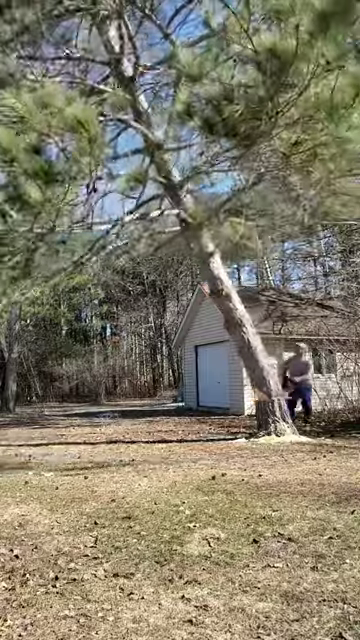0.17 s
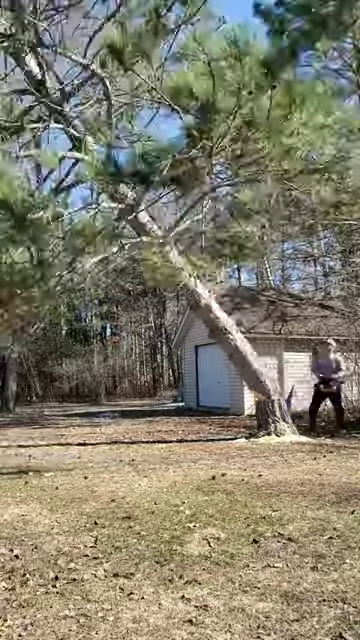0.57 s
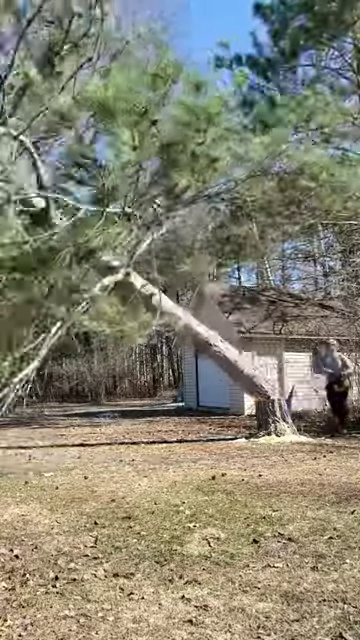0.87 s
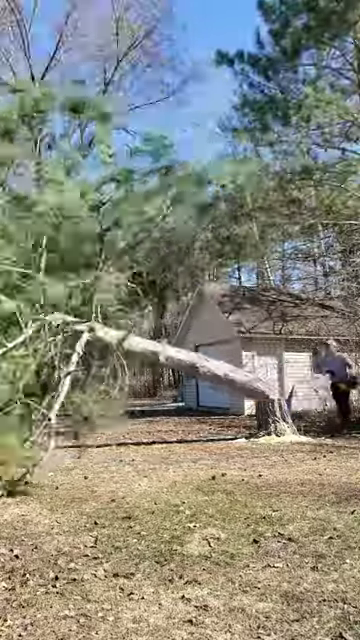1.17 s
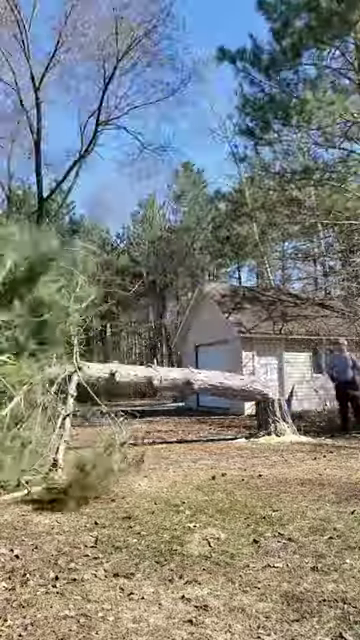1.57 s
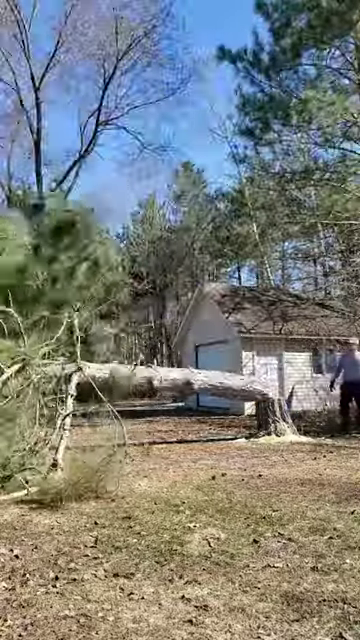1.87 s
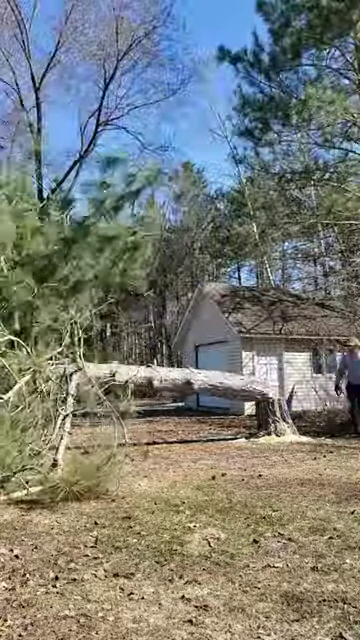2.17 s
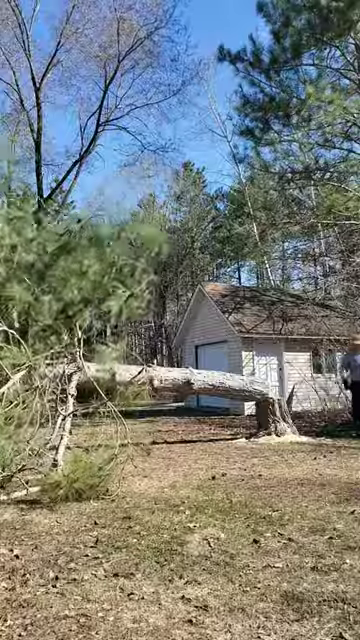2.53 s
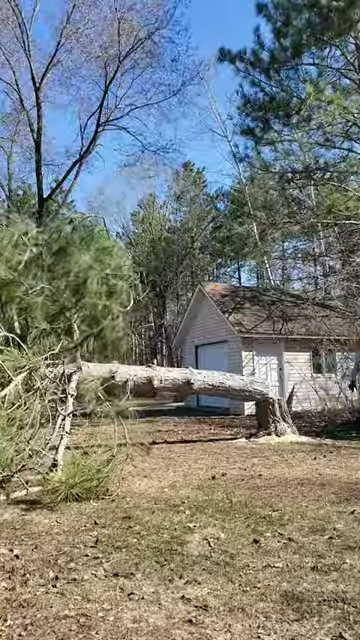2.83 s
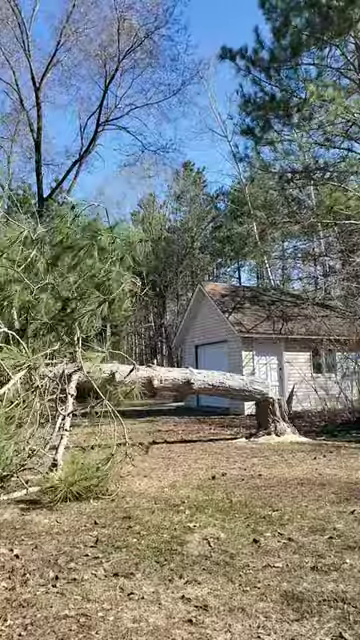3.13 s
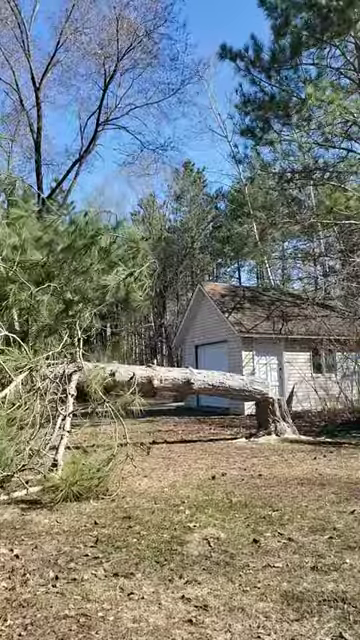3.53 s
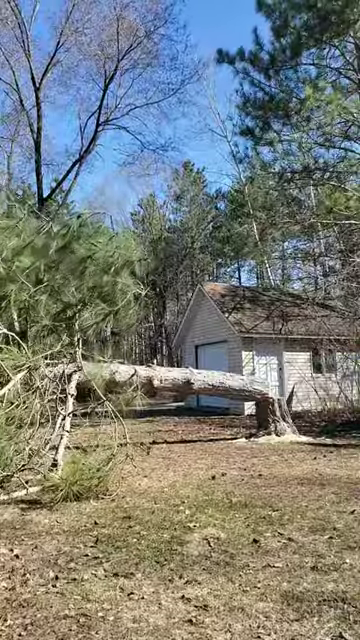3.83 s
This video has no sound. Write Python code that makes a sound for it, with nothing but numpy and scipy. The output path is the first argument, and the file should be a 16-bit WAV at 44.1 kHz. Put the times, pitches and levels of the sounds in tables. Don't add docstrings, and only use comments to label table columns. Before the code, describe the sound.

Tree falling in an open yard: creaky wood cracks quicken, branches snap and needles hiss on impact, settling with a few late snaps before strong gusts buffet the phone microphone.

```python
import sys
import numpy as np
from scipy import signal
from scipy.io import wavfile
from scipy.ndimage import uniform_filter1d

SR = 44100
rng = np.random.default_rng(int(sys.argv[2]) if len(sys.argv) > 2 else 0)


def to_wav(sig):
    pcm = np.clip(np.atleast_2d(sig), -1, 1) * 32767
    pcm = np.round(pcm).astype(np.int16)
    wavfile.write(sys.argv[1], SR, pcm.T)


def decibels_to_gain(level_db):
    exponent = np.asarray(level_db, float) / 20
    return 10 ** exponent


N = 176400

# frequency in Hz, level in dB.
AIR_SPECTRUM = [(150, -9), (400, -4.5), (1360, -16.5), (4200, -19.5), (11600, -30), (15500, -56)]
# frequency in Hz, level in dB.
BUFFET_SPECTRUM = [(15, -42), (30, -3.5), (65, 6), (90, 0.5), (190, -9.5), (400, -24.5), (700, -38)]
# centre in seconds, peak in dB, length in seconds, eddy rate in Hz.
LEFT_GUSTS = [(.023, -32.5, 0.046, 73), (.098, -33.5, .026, 87.2), (.146, -39.5, .025, 69),
              (.248, -43, .038, 66.6), (.297, -46, 0.024, 85.5), (.324, -44.5, .024, 68),
              (.401, -46.5, 0.021, 71), (.53, -39, .026, 86.7), (.565, -45, 0.027, 77.4),
              (.605, -43.5, 0.042, 85), (.705, -38, .023, 80), (.733, -38, .02, 85.3),
              (.79, -42.5, .014, 204), (1.38, -50, 0.065, 110.5), (1.483, -42, .014, 226),
              (1.55, -60, .07, 93.2), (1.623, -52.5, .05, 102), (1.82, -56, .06, 84.8),
              (2.778, -42.5, .031, 84), (2.836, -44, .022, 100), (2.974, -35, .04, 74.3),
              (3.033, -48, .019, 114), (3.085, -34, 0.058, 84.2), (3.17, -36.5, .04, 84.4),
              (3.207, -38, .02, 104), (3.247, -25.5, .021, 106.5), (3.275, -28.5, .02, 117.6),
              (3.325, -41, 0.048, 91), (3.385, -38, 0.049, 86.5), (3.436, -43.5, .019, 117),
              (3.477, -43, .023, 75), (3.542, -38, .034, 77.3), (3.585, -48, .024, 82),
              (3.62, -38.5, .025, 98.3), (3.65, -39, 0.022, 89.7), (3.68, -37, 0.023, 77.5),
              (3.712, -35, 0.036, 78), (3.766, -30.5, 0.024, 148.8), (3.944, -45, .052, 97.4)]
# centre in seconds, peak in dB, length in seconds, eddy rate in Hz.
RIGHT_GUSTS = [(0.16, -41.5, .027, 83.5), (0.25, -47, .018, 121), (.544, -55, 0.029, 93),
               (0.711, -39, .023, 86), (.737, -38, 0.02, 117), (0.823, -48, 0.045, 112.8),
               (1.381, -50, 0.061, 122.5), (1.48, -47, 0.0136, 228), (1.588, -57, 0.098, 90.5),
               (2.102, -58.5, .08, 95), (2.762, -46, 0.017, 97), (2.83, -40, 0.045, 114.4),
               (2.878, -43, 0.029, 68), (2.921, -36, 0.025, 99), (2.982, -37, .03, 78.6),
               (3.035, -31.5, .021, 95.4), (3.08, -29.5, .024, 83.5), (3.172, -37.5, .031, 110.5),
               (3.211, -37, .018, 86), (3.242, -27, 0.034, 98), (3.302, -30.5, .03, 80),
               (3.34, -33.5, .022, 80), (3.389, -39.5, 0.036, 89.8), (3.462, -46.5, 0.043, 91),
               (3.532, -39.5, 0.035, 101.3), (3.585, -44, 0.01, 74), (3.616, -33.5, .019, 85.5),
               (3.672, -33, 0.037, 66.4), (3.716, -37, .022, 78.7), (3.762, -30.5, .016, 171.3),
               (3.791, -32, .045, 100.7), (3.86, -36, .061, 63), (3.949, -36.5, .033, 70)]
# time in seconds, level in dB, needle brightness in dB.
CROWN_RUSH = [(0, -45, -44), (.2, -59.5, -13), (0.601, -62.5, -9.5), (1.0, -61, -10), (1.15, -50.5, -5.5),
              (1.4, -45, -11.5), (1.72, -50, -9), (1.92, -58.5, -6), (2.05, -64, -6.5), (2.8, -62.5, -5.5),
              (3.15, -64, -11), (4, -69.5, -12.5)]
# frequency in Hz, level in dB.
BOUGH_SPECTRUM = [(150, -16), (400, -6), (1100, -9.5), (3000, -12), (6500, -12), (9000, -26)]
# frequency in Hz, level in dB.
NEEDLE_SPECTRUM = [(6000, -57), (8500, 12), (10000, 16), (14000, 11), (15600, 8)]
# start in seconds, peak in dB, ring in Hz, length in seconds, treble in dB.
SPLINTERS = [(.002, -29.5, 3250, 0.014, -39), (0.022, -31, 2390, 0.011, -1.5), (0.256, -37, 3900, 0.013, 0),
             (0.355, -30.5, 2190, .012, -37), (0.379, -46, 3570, 0.1, -30), (0.43, -26, 1520, 0.012, -33),
             (0.446, -30.5, 1150, 0.053, -52), (0.47, -45, 630, 0.011, -45), (0.475, -32, 3300, 0.011, -52),
             (0.492, -35.5, 1220, 0.049, -28), (.535, -34.5, 1180, 0.044, -42),
             (0.571, -41, 1170, 0.046, -25), (0.587, -37.5, 3400, 0.02, -1.5),
             (0.653, -30.5, 2360, 0.02, -28), (0.703, -37, 5740, 0.015, -6),
             (0.74, -42.5, 3620, 0.0079, -9), (0.759, -35.5, 1740, 0.011, -11),
             (0.781, -28.5, 1390, 0.0095, -35), (0.796, -33, 1070, 0.05, -43),
             (0.824, -35.5, 1160, 0.046, -33), (0.851, -32, 1320, 0.0072, -43),
             (0.878, -34, 2470, 0.029, -6), (0.913, -40, 1800, 0.022, -20), (0.957, -31, 1390, 0.016, -36),
             (0.992, -32, 1130, 0.015, -13), (1.016, -32, 890, 0.035, -12), (1.038, -34, 850, 0.044, -4.5)]
# start in seconds, peak in dB, ring in Hz, length in seconds, treble in dB.
SNAPS = [(1.099, -38, 3520, 0.012, 2), (1.117, -35, 1800, 0.017, -15), (1.135, -30, 3320, 0.018, -9),
         (1.152, -32, 2410, 0.035, -1.5), (1.173, -50, 1770, 0.011, -5), (1.197, -36.5, 3300, 0.015, -12),
         (1.221, -31.5, 2750, 0.0063, -20), (1.246, -29, 2870, 0.013, -21), (1.264, -37, 4720, 0.036, -5),
         (1.298, -36.5, 3220, 0.017, -2), (1.319, -30.5, 3060, 0.014, -3), (1.336, -32.5, 1120, 0.032, -11),
         (1.362, -30, 3830, 0.048, -1), (1.386, -37, 4540, 0.0034, -2), (1.405, -39.5, 1620, 0.025, 1),
         (1.45, -45, 3060, 0.0048, -16), (1.469, -29, 1140, 0.011, -47), (1.499, -33.5, 2840, 0.019, 0.5),
         (1.553, -29.5, 2680, 0.012, -13), (1.572, -37, 2740, 0.078, 0), (1.638, -38.5, 2130, 0.065, 3),
         (2.333, -49.5, 3020, 0.011, -15), (2.837, -46.5, 4270, 0.0091, -3), (2.957, -54.5, 4230, 0.013, 7),
         (3.388, -53.5, 2800, 0.011, -7), (1.706, -49, 1200, 0.37, -45)]
# frequency in Hz, level in dB.
WOOD_SPECTRUM = [(150, -4.5), (300, -6.5), (700, -4.5), (1200, -3), (2500, -5.5), (4500, -9), (6800, -21),
                 (9000, -26.5)]
# frequency in Hz, time to fall 60 dB in seconds.
YARD_DECAY = [(500, 0.43), (3000, 0.71), (15000, 0.027)]
# centre in seconds, gain change in dB.
DUCKS = [
    (0.343, 1.5),
    (0.428, -14.5),
    (.645, -1.5),
    (1.088, -5.5),
    (1.243, -5),
    (1.543, 0.5),
]


def evened(x):
    return x / np.sqrt(np.mean(x ** 2) + 1e-20)


def read(points, hz):
    f, value = np.transpose(points)
    return np.interp(np.log(hz + 1), np.log(f + 1), value)


def colour(x, points):
    hz = np.fft.rfftfreq(8192, 1 / SR)
    points = [(points[0][0] / 2, -90)] + list(points) + [(points[-1][0] * 1.5, -90)]
    log_gain = read(points, hz) * np.log(10) / 20
    log_gain = np.concatenate([log_gain, log_gain[-2:0:-1]])
    minimum_phase = np.exp(np.conj(signal.hilbert(log_gain)))
    taps = np.fft.ifft(minimum_phase).real[:4096]
    return signal.oaconvolve(x, taps[None] / np.linalg.norm(taps), axes=1)[:, :x.shape[1]]


def patchy(x, depth_db, size=512):
    z = signal.stft(x, nperseg=size)[2]
    field = rng.standard_normal(z.shape[1:])
    field = uniform_filter1d(field, size=5, axis=0)
    field = evened(uniform_filter1d(field, size=6, axis=1))
    return signal.istft(z * decibels_to_gain(depth_db * field), nperseg=size)[1][:, :N]


def wander(span_s):
    n = max(round(span_s * SR), 2)
    once = uniform_filter1d(rng.standard_normal((2, N)), n, axis=1)
    return evened(uniform_filter1d(once, n, axis=1))


def grit(per_s, spread_db):
    struck = rng.random((2, N)) < per_s / SR
    size = decibels_to_gain(spread_db * np.minimum(rng.exponential(1, (2, N)), 5))
    return evened(struck * rng.choice([-1., 1.], (2, N)) * size)


def swell(length, rise, fall, sag_db):
    t = np.arange(0, length + 8 * fall, 1 / SR)
    attack = np.sin(np.pi / 2 * np.minimum(t / rise, 1)) ** 2
    sag = decibels_to_gain(sag_db * (np.maximum(t - rise, 0) / length) ** 2)
    return attack * sag * np.exp(-np.maximum(t - length, 0) / fall)


def add(mix, s, sound):
    part = mix[:, max(round(s * SR), 0):][:, :sound.shape[1]]
    part += sound[:, :part.shape[1]]


def air():
    return decibels_to_gain(-66.5) * patchy(colour(rng.standard_normal((2, N)), AIR_SPECTRUM), 1.3)


def wind():
    breeze_db, gust_db, slap_db, roll_db = -65, -4.5, 14.5, -2
    spread, pitch_wobble, steadiness = 0.58, 0.184, 0.5
    push = decibels_to_gain(breeze_db + 3.3 * wander(0.053))
    rolls, wobble = np.zeros((2, N)), wander(0.011)
    for port, gusts in enumerate([LEFT_GUSTS, RIGHT_GUSTS]):
        for s, db, length, hz in gusts:
            first = max(round((s - 2 * length) * SR), 0)
            n = np.arange(first, min(round((s + 2 * length) * SR), N))
            shape = decibels_to_gain(db) * np.exp(-((n / SR - s) / (spread * length)) ** 2)
            push[port, n] += decibels_to_gain(gust_db) * shape
            turns = rng.random() + np.cumsum(hz * (1 + pitch_wobble * wobble[port, n])) / SR
            rolls[port, n] += shape * np.cos(2 * np.pi * turns)
    eddies = colour(rng.standard_normal((2, N)), BUFFET_SPECTRUM)
    power = uniform_filter1d(eddies ** 2 + 0.00075, 900, axis=1)
    eddies = evened(eddies / power ** (steadiness / 2))
    slap_band = signal.butter(2, [150, 330], "band", fs=SR, output="sos")
    slap = evened(signal.sosfilt(slap_band, rng.standard_normal((2, N))))
    buffeting = push * eddies + push ** 2 * decibels_to_gain(slap_db) * slap
    return buffeting * decibels_to_gain(wander(0.03)) + decibels_to_gain(roll_db) * rolls


def crown():
    calm_db, stirred_db, twigs_per_s, twig_db, twig_decay_s = -66, -52, 170, -9.5, 0.0046
    s, db, bright_db = np.transpose(CROWN_RUSH)
    t = np.arange(N) / SR
    level_db = np.interp(t, s, db)
    stirred = np.clip((level_db - calm_db) / (stirred_db - calm_db), 0.15, 1)
    ticks = abs(grit(twigs_per_s, 2.5)[:1])
    twigs = evened(signal.lfilter([1], [1, -np.exp(-1 / (twig_decay_s * SR))], ticks))
    flicker_db = stirred * (wander(0.033)[0] * 0.33 + wander(0.023)[0] * 0.59)
    stir = rng.standard_normal((2, N)) * (1 + stirred * decibels_to_gain(twig_db) * twigs)
    stir = stir * decibels_to_gain(level_db + flicker_db)
    boughs = decibels_to_gain(-2.5) * colour(stir, BOUGH_SPECTRUM)
    needles = colour(stir * decibels_to_gain(np.interp(t, s, bright_db) - 1.0), NEEDLE_SPECTRUM)
    return patchy(boughs + needles, 2.64, size=256)


def cracks():
    rise_s, rise_share, fall_s, sag_db = 0.0032, 0.34, 0.0044, -29
    crack_db, treble_trim_db, ring_db, ring_width = -12, -0.5, 0.5, 0.27
    fibres = grit(3000, 2)
    body, top, ring = np.zeros((3, 2, N))
    for s, db, hz, length, treble_db in SPLINTERS + SNAPS:
        shape = swell(length, rise_s + rise_share * length, fall_s, sag_db)
        burst = fibres[:, round(s * SR):][:, :len(shape)] * shape
        burst = burst * np.sqrt((shape ** 2).sum() / (burst ** 2).sum(axis=1, keepdims=True))
        burst = burst * decibels_to_gain(db + crack_db)
        add(body, s, burst)
        add(top, s, burst * shape * decibels_to_gain(treble_db + treble_trim_db))
        b, a = signal.iirpeak(hz, 1 / ring_width, SR)
        rung = signal.lfilter(b, a, np.pad(burst, [(0, 0), (0, 400)]))
        add(ring, s, rung * np.sqrt(SR / (np.pi * hz * ring_width)) * decibels_to_gain(ring_db))
    treble = signal.lfilter(*signal.butter(2, 10000, fs=SR), colour(top, NEEDLE_SPECTRUM))
    tearing = patchy(colour(body, WOOD_SPECTRUM) + treble, 3.4, size=128)
    return tearing + signal.lfilter(*signal.butter(4, 6500, fs=SR), ring)


def yard(x):
    taps = np.zeros((2, SR // 2))
    at = np.arange(400, SR // 2 - 20, 20) + rng.integers(0, 20, (2, (SR // 2 - 401) // 20))
    np.put_along_axis(taps, at, rng.choice([-1., 1.], at.shape), 1)
    hz, t, z = signal.stft(taps, SR, nperseg=256)
    decay = decibels_to_gain(-60 * t / read(YARD_DECAY, hz)[:, None])
    tail = signal.istft(z * decay, SR, nperseg=256)[1]
    return signal.fftconvolve(x[::-1], tail / np.linalg.norm(tail[0]), axes=1)[:, :N]


def scene():
    wood = cracks()
    return air() + wind() + crown() + wood + decibels_to_gain(-13) * yard(wood)


def low_pass(x):
    return signal.sosfilt(signal.butter(12, 15680, fs=SR, output="sos"), x)


def record(dry):
    duck_s = 0.013
    t = np.arange(N) / SR
    duck_db = sum(db * np.exp(-((t - s) / duck_s) ** 4) for s, db in DUCKS)
    ducked = dry * decibels_to_gain(duck_db)
    b, a = signal.iirpeak(7750, 10, SR)
    heard = ducked - 0.35 * signal.lfilter(b, a, ducked)
    band_edge = signal.ellip(10, 0.5, 80, 15560, fs=SR, output="sos")
    heard = signal.sosfilt(band_edge, heard)
    return low_pass(heard)


dry = scene()
out = record(dry)
to_wav(out)
```